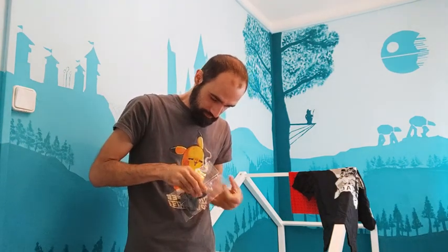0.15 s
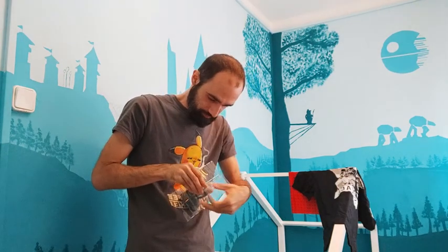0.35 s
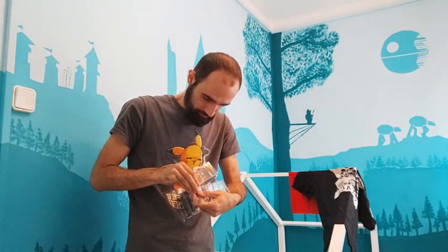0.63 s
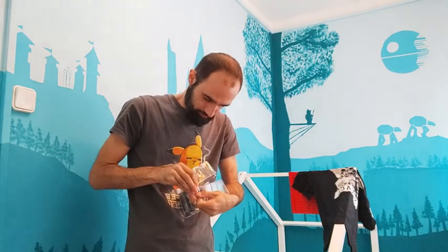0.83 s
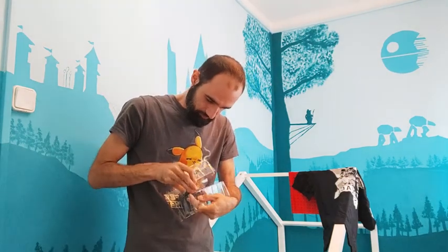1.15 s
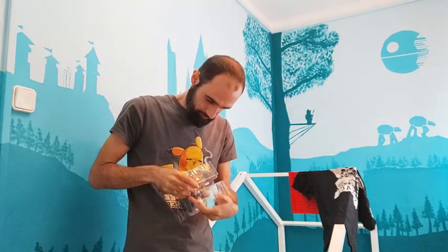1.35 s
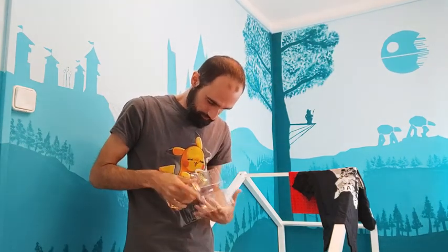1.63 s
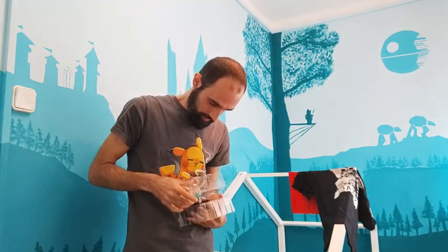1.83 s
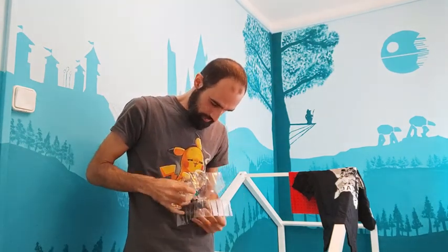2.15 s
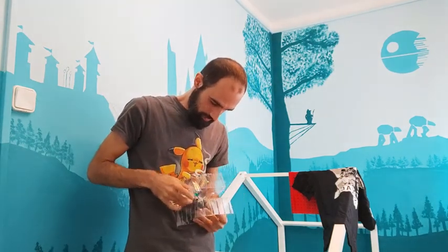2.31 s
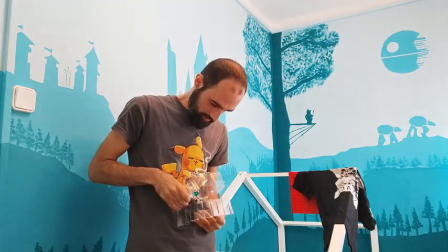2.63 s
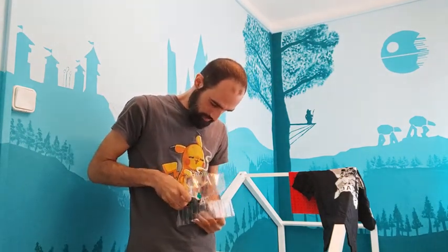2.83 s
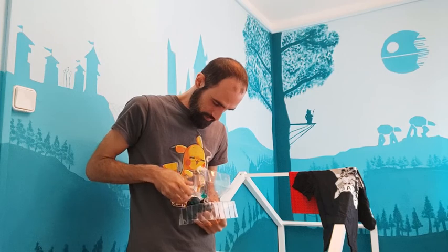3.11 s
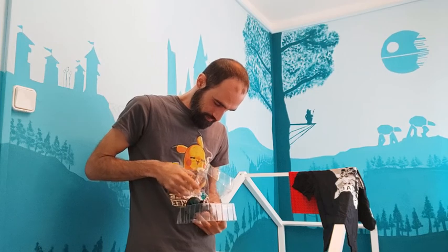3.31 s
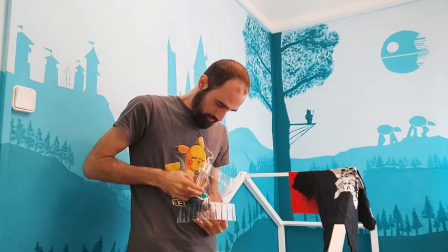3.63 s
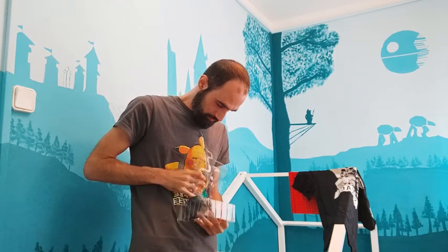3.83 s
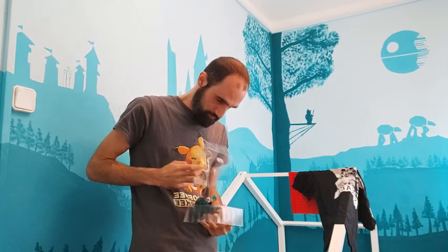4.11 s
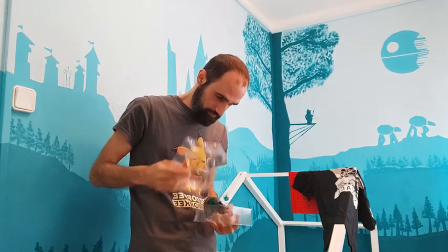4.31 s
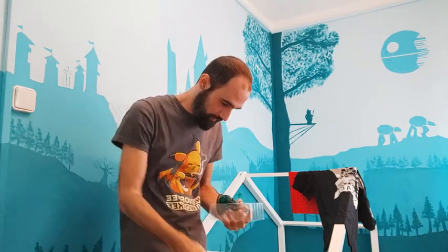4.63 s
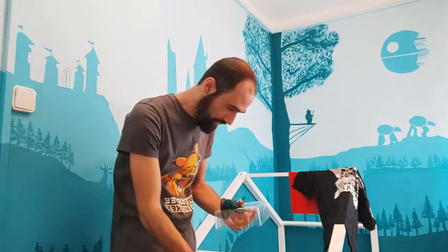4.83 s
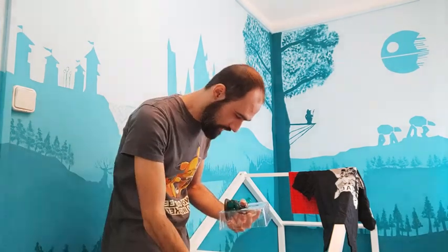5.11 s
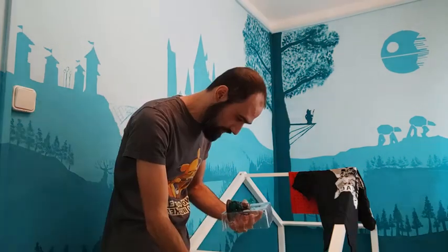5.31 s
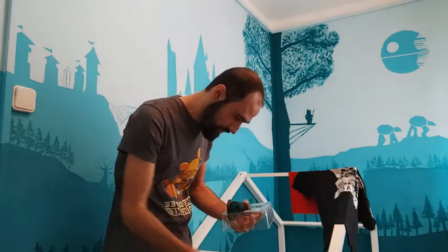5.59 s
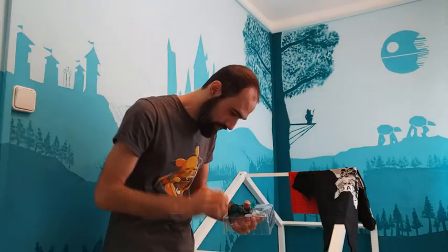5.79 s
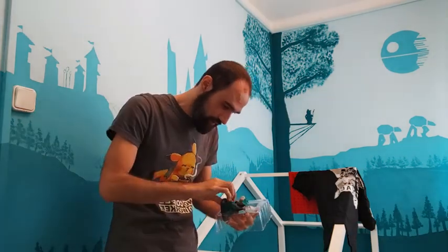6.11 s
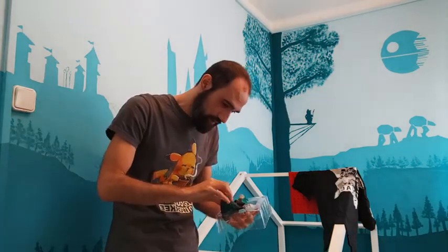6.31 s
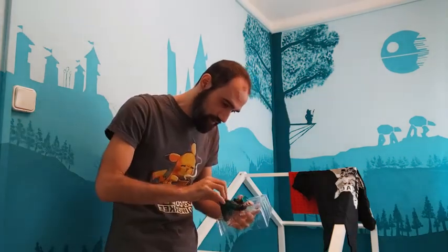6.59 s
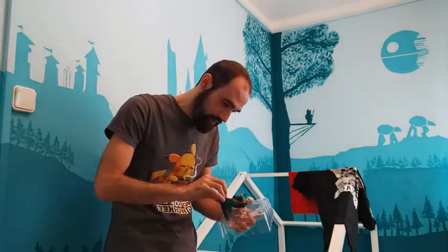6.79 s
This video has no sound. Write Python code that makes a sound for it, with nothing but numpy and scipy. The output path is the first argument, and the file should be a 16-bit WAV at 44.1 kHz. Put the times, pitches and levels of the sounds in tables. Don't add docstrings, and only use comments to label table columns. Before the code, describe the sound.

In a bare, reverberant bedroom, a man's hands bend and pry a thin ribbed plastic package about two metres from the microphone. Sharp snaps come in uneven clusters, with creaking sheet, twanging ribs, hollow pops and soft thuds. The crackling is densest near three seconds, a hard crack follows around 4.4, then weaker snaps fade into faint ticks over rumble, hum and hiss.

```python
import sys
import numpy as np
from scipy import signal
from scipy.fft import rfft, irfft
from scipy.io import wavfile
from scipy.ndimage import uniform_filter1d

SR = 44100
rng = np.random.default_rng(int(sys.argv[2]) if len(sys.argv) > 2 else 0)


def level_to_linear(level):
    exponent = np.asarray(level, float) / 20
    return 10 ** exponent


def master(y):
    cut = np.clip(np.atleast_2d(y).T, -1, 1)
    pcm = np.round(cut * 32767)
    wavfile.write(sys.argv[1], SR, pcm.astype(np.int16))


N = 306492
ARRIVAL_S = 0.0015


def rms_one(x):
    return x / np.sqrt(np.mean(x ** 2) + 1e-20)


def at_hz(points, hz):
    table = np.array(points)
    return np.interp(np.log(hz), np.log(table[:, 0]), table[:, 1])


def ring(clicks, hz, t60):
    radius = level_to_linear(-60 / (t60 * SR))
    angle = 2 * np.pi * hz / SR
    return signal.lfilter([0, np.sin(angle)], [1, -2 * radius * np.cos(angle), radius ** 2], clicks + 1e-18)


def causal(db, size):
    cepstrum = irfft(db * np.log(10) / 20, size)
    cepstrum[..., 1:size // 2] *= 2
    cepstrum[..., size // 2 + 1:] = 0
    return np.exp(rfft(cepstrum))


EDGES_HZ = 24 * 2 ** np.arange(0, 9.6, .4)


def stereo_bands(size, likeness, shape):
    white = rng.standard_normal((2, 2, size))
    out = 0
    for k, (low, high) in enumerate(zip(EDGES_HZ, EDGES_HZ[1:])):
        hz = np.sqrt(low * high)
        mid, side = white[k % 2]
        alike = np.clip(at_hz(likeness, hz), -1, 1)
        pair = np.sqrt((1 + alike) / 2) * mid + np.sqrt((1 - alike) / 2) * side * [[1], [-1]]
        band = signal.butter(2, [low, high], "band", fs=SR, output="sos")
        out = out + signal.sosfilt(band, shape(hz, pair))
    return out


# (f/Hz, level/dB per Hz)
FLOOR = [(50, -28), (85, -3.5), (101, -3.5), (195, 3), (249, -8.5), (926, -22.5), (1030, -13.5),
         (1570, -29), (2080, -21), (3300, -29.5), (8290, -26), (10300, -33.5), (16000, -50)]
# (f/Hz, likeness 0..1)
FLOOR_LIKENESS = [(60, 0.9), (240, 0.5), (950, 0.04), (3770, 0.07), (15000, 0.48)]
FLOOR_DB = -68
HUM_HZ, HUM_WIDTH_HZ, HUM_DB = 50, 3.6, -64.5


def background():
    white = stereo_bands(N, FLOOR_LIKENESS, lambda hz, noise: noise)
    hz = np.arange(N // 2 + 1) * SR / N + 1
    hiss = irfft(rfft(white) * level_to_linear(at_hz(FLOOR, hz)), N)
    settle = 40000
    hum = rng.standard_normal(N + settle)
    hum = ring(hum, HUM_HZ, 2.2 / HUM_WIDTH_HZ)
    hum = ring(hum, HUM_HZ, 0.057)[settle:]
    hum_sides = level_to_linear(np.array([[2.2], [-2.2]]))
    return level_to_linear(FLOOR_DB) * rms_one(hiss) + level_to_linear(HUM_DB) * rms_one(hum) * hum_sides


# (t/s, spread/s, level/dB, bright share level/dB)
BENDS = [(.01, 0.03, -36, 6.5), (0.188, 0.083, -29.5, -0.5), (.48, 0.04, -52, 5.5), (.69, 0.16, -44, -23),
         (0.829, 0.036, -55, 5.5), (1.11, 0.049, -40, -7.5), (1.3, 0.25, -44, 1), (1.59, 0.094, -40.5, 2.5),
         (2.05, 0.37, -56, 4.5), (2.42, 0.042, -68.5, 14), (2.67, 0.033, -52, -10),
         (2.81, 0.051, -43.5, 25.5), (2.94, 0.025, -34.5, 3.5), (3.031, 0.14, -38.5, -22.5),
         (3.42, 0.22, -49.5, 8.5), (3.83, .06, -52, 8), (4.1, 0.098, -51, 6.5), (4.449, 0.12, -55.5, -5.5),
         (4.6, 0.22, -64.5, 15), (5.07, 0.16, -50.5, 0.5), (5.46, 0.075, -38.5, -26),
         (5.56, 0.11, -39.5, -3), (5.75, 0.18, -59.5, -3), (6.2, 0.028, -72, -9), (6.49, 0.057, -71, -1),
         (6.58, 0.055, -70.5, 1), (6.68, 0.059, -68.5, 2), (6.76, .05, -73, -9), (5.98, 0.031, -79, -4)]
BEND_RISE_DB, BEND_FALL_DB = 16, 13


def bending(step=200):
    s, spread, db, bright_db = np.transpose(BENDS)[..., None]
    knots = np.arange(0, N, step)
    late = (knots / SR - s) / spread
    swell_db = db + np.minimum(BEND_RISE_DB * late, -BEND_FALL_DB * late)
    dull = level_to_linear(swell_db).sum(axis=0)
    bright = level_to_linear(swell_db + bright_db).sum(axis=0)
    return [np.interp(np.arange(N), knots, gain) for gain in (dull, bright)]


def creak():
    wander = np.repeat(rng.standard_normal(N // 400 + 1), 400)[:N]
    clumps = level_to_linear(6.8 * rms_one(wander))
    slips = rng.random((2, N)) < 400 * clumps / SR
    slips = slips * level_to_linear(2.2 * np.minimum(rng.exponential(1, (2, N)), 5))
    slips = slips * rng.choice([-1, 1], (2, N))
    dull = signal.sosfilt(signal.butter(2, 2500, fs=SR, output="sos"), slips[0] + 1e-18)
    bright = signal.sosfilt(signal.butter(2, 2500, "high", fs=SR, output="sos"), slips[1] + 1e-18)
    dull_gain, bright_gain = bending()
    return rms_one(dull) * dull_gain * level_to_linear(-8) + rms_one(bright) * bright_gain * level_to_linear(-9.5)


PARTS_HZ = [520, 1400, 2700, 3500, 7400]
RIM_FOLLOWS_RIBS, RIM_DB = 0.39, 2
RIB_TOP_DB = 0
VOLLEY_S, FOLLOWERS_DB = 0.0027, -3
RAGGED_DB = 7


def buckle(film_db, panels_db, ribs_db, length, count=24, size=4096):
    wait, strength, sign = rng.random((count, 3)).T
    volley = np.zeros(size)
    delays = np.minimum(-length * np.log(wait) * SR, size // 2).astype(int)
    np.add.at(volley, delays, level_to_linear(FOLLOWERS_DB - 16 * strength) * np.sign(sign - .5))
    volley[0] = VOLLEY_S / length

    hz = np.arange(size // 2 + 1) * SR / size + 1
    rim_db = RIM_DB + RIM_FOLLOWS_RIBS * ribs_db
    parts_db = np.array([panels_db, ribs_db, ribs_db + RIB_TOP_DB, rim_db, 0])
    per_hz_db = parts_db - 10 * np.log10(np.array(PARTS_HZ) / PARTS_HZ[-1])
    ragged = np.c_[np.geomspace(300, 16000, count), RAGGED_DB * (strength - .5)]
    colour_db = film_db + 12.0 + at_hz(ragged, hz) + at_hz(np.c_[PARTS_HZ, per_hz_db], hz)

    spread = rfft(rms_one(volley) / np.sqrt(size))
    spread /= causal(15 * np.log10(abs(spread) + 0.14), size)
    return irfft(spread * causal(colour_db, size), size)


# (t/s, film level/dB, panels level/dB, ribs level/dB), the last two relative to the film
CRACKS = [(.003, -20, -12, -2), (.064, -13.5, -18, -5.5), (.155, -8.5, -30, -7.5), (0.795, -24, -14.5, -13),
          (1.189, -24.5, -1, -3), (1.264, -11, -19, -7.5), (1.432, -8, -18.5, -4.5),
          (1.491, -15.5, -8.5, -3.5), (1.573, -20, -19, -14), (2.219, -27.5, -14.5, -8),
          (2.616, -19.5, -23.5, -7), (2.681, -28.5, -42, 3), (2.748, -22.5, -26.5, -10),
          (2.796, -14.5, -15, -14), (2.849, -21.5, -10.5, -7), (2.913, -10, -18.5, -8),
          (2.938, -8.5, -21, -3.5), (3.025, -8.5, -29.5, -8.5), (3.134, -9.5, -22, -8),
          (3.466, -19, -14.5, -7.5), (3.766, -2, -10, 5.5), (4.026, -26, -3.5, 0), (4.379, -27, -4, -2),
          (4.409, 1.2, -22.5, -6.5), (4.679, -32, -17, -9), (4.886, -42, 20.5, -23),
          (5.418, -14.5, -13, -3.5), (5.6, -21.5, -7, 2), (5.801, -36.5, -50, 6)]
# (t/s, film level/dB, panels level/dB, ribs level/dB), likewise
YIELDS = [(.088, -18.5, -8, 0), (0.485, -32.5, -12, -5.5), (.642, -17.5, -6.5, -2), (.755, -44.5, 17, -3.5),
          (.821, -10, -11, -4), (1.021, -3, -13.5, -3.5), (1.026, -3.5, -7, 2), (1.806, -20.5, -4, -1),
          (2.823, -3.5, -11.5, 4.5), (2.892, -5.5, -19, -7), (3.296, -31.5, 2.5, -2.5),
          (3.315, -17, -10.5, -8), (3.377, -20.5, -13, 1.1), (3.504, -18.5, -13.5, -1.2),
          (3.744, -20, -11, 0), (4.005, -43, 5.5, 11), (4.049, -16, -12.5, 1.3), (4.870, -34, 10, 12.5),
          (5.039, -43.5, 13.5, 2), (5.233, -27.5, 5.5, 13), (5.511, -24.5, 2, -1), (5.540, -19, -41, -1)]
# (t/s, film level/dB, ribs level/dB relative to the film)
TICKS = [(.46, -53, -7), (1.748, -34, -22), (1.996, -57, -8), (2.098, -27.5, -9), (2.347, -32.5, -9.5),
         (2.482, -28.5, -14.5), (2.708, -37, -4), (3.109, -46, -13), (3.683, -43.5, 0), (4.316, -39, 0.5),
         (5.459, -50, -6), (5.889, -52, 5), (5.979, -66, 0), (6.176, -47.5, -3.5), (6.48, -65, 0),
         (6.638, -53, 2.5)]
YIELD_S, WEAK_LASTS = .006, .21
TICK_S, TICK_PANELS_DB = 0.018, -3


def snaps(size=4096, places=3):
    rows = [(*row, VOLLEY_S) for row in CRACKS]
    rows += [(s, film, ribs + TICK_PANELS_DB, ribs, TICK_S) for s, film, ribs in TICKS]
    for s, film, panels, ribs in YIELDS:
        strongest_db = film + max(panels, ribs, 0)
        rows.append((s, film, panels, ribs, YIELD_S * level_to_linear(-WEAK_LASTS * strongest_db)))
    out = np.zeros((places, N + size))
    for k, (s, film, panels, ribs, length) in enumerate(rows):
        at = max(round((s + ARRIVAL_S) * SR), 0)
        out[k % places, at:at + size] += buckle(film, panels, ribs, length, size=size)
    return out[:, :N]


# (f/Hz, level/dB)
COLOUR = [(50, -41.5), (110, -17.5), (180, -6), (300, -9), (520, 3.5), (1100, 1), (1500, -3.5),
          (2700, -2.5), (3200, -8), (5300, -6), (7600, 4), (9000, 0.5), (10000, -12), (15200, -28),
          (16400, -31)]
# (f/Hz, level/dB)
LEFT_OVER_RIGHT = [(60, -20), (110, 11.5), (200, -0.5), (380, 6), (700, 3), (1290, 3.5), (2380, -0.5),
                   (4400, -3.5), (8120, -4), (15000, 8)]
# (f/Hz, t/s)
ROOM_T60 = [(100, 0.71), (260, 0.56), (700, 0.41), (1840, 0.4), (4850, 0.41), (12800, 0.32)]
# (f/Hz, likeness 0..1)
LIKENESS = [(60, .75), (130, 1), (290, 1), (640, 0.1), (1400, 0.02), (3000, 0.39), (5500, 0.087),
            (7500, 0.66), (10000, 1), (15000, 0.28)]
ROOM_DB, BUILD_UP_S = -25, 0.00098
EARLY_DB, EARLY_S = 4.5, 0.037


def bedroom(x):
    size = 2 ** 15
    t = np.arange(size) / SR
    hz = np.arange(size // 2 + 1) * SR / size + 1
    density = np.minimum(0.036 + 12 * t, 1)
    echoes = (rng.random(size) < density) / np.sqrt(density)
    echoes *= 1 - np.exp(-t / BUILD_UP_S)
    echoes *= level_to_linear(EARLY_DB * np.exp(-t / EARLY_S))

    def decay(f, noise):
        return noise * echoes * level_to_linear(ROOM_DB - 60 * t / at_hz(ROOM_T60, f))

    room = stereo_bands(size, LIKENESS, decay)
    room[:, 0] += 1
    colour_db = at_hz(COLOUR, hz) + at_hz(LEFT_OVER_RIGHT, hz) * np.array([[.5], [-.5]])
    response = irfft(rfft(room) * causal(colour_db, size), size)
    return signal.fftconvolve(x[None], response, axes=1)[:, :N]


def single_modes(rows, cycles, gain_db):
    size = 4096
    t = np.arange(size) / SR
    out = np.zeros(N + size)
    for s, peak_db, hz in rows:
        at = round((s + ARRIVAL_S) * SR)
        fade = level_to_linear(peak_db + gain_db - 60 * t * hz / cycles)
        out[at:at + size] += fade * np.sin(2 * np.pi * hz * t)
    return out[:N]


# (t/s, peak level/dB, f/Hz)
TWANGS = [(0.0657, -25, 1540), (0.6424, -37.5, 2020), (1.0266, -14.5, 2162), (1.2645, 2, 2740),
          (1.4336, -28, 2300), (1.5724, -30, 1290), (2.6154, -34, 2286), (2.6828, -42.5, 2120),
          (2.825, -3.5, 1494), (2.826, 8.5, 2050), (1.027, -16, 4250), (4.411, -10, 2170),
          (5.235, -24, 2400), (5.601, -3, 4600), (5.546, -32, 4500), (3.1334, -23, 2208),
          (3.3804, -30.5, 2245), (3.7534, -9, 1722), (3.7678, -4, 1630), (4.0272, -27, 1890),
          (4.0487, -23, 2200), (4.8778, -25, 2660), (5.235, -10, 1280), (5.4191, -40, 1200),
          (5.5454, -6.5, 2860), (5.8017, -30, 2500)]


def twangs():
    return single_modes(TWANGS, cycles=6.5, gain_db=-12.5)


# (t/s, peak level/dB, f/Hz)
POPS = [(0.155, -23, 837), (0.643, -28, 647), (0.821, -42.5, 503), (1.028, -8, 938), (1.03, -16, 567.5),
        (1.187, -24.5, 340), (1.806, -25.5, 1040), (2.939, -24.5, 572), (3.321, -27, 358),
        (3.38, -24, 1070), (3.51, -20, 1065), (3.769, -18, 526), (4.05, -29, 999), (4.412, -23, 644),
        (4.872, -24, 420), (4.888, -28, 519), (4.885, -26, 866), (5.234, -22, 594), (5.235, -32.5, 1000),
        (5.42, -23.5, 1130), (5.547, -34, 592), (5.602, -31.5, 586)]


def pops():
    return single_modes(POPS, cycles=19, gain_db=-6.5)


# (t/s, peak level/dB, f/Hz)
THUDS = [(0.156, -52, 198), (1.024, -37, 230), (1.43, -55, 189), (1.806, -68, 155), (2.822, -35, 170),
         (3.32, -40, 242), (3.38, -51, 185), (3.766, -37, 192), (4.047, -49.5, 195), (4.409, -46.5, 223),
         (4.874, -42, 223), (5.236, -45, 248), (5.458, -40.5, 218), (5.542, -36.5, 217), (5.658, -50, 233)]


def thuds():
    return single_modes(THUDS, cycles=21, gain_db=3.0)


LOWERED_S, LOWERING_S = 4.3, .2
RAISED_LEFT_DB, LOWERED_LEFT_DB = 0.67, 0


def scene():
    shell = snaps()
    shell[0] += creak() + thuds()
    shell[1] += pops()
    shell[2] += twangs()
    in_room = sum(bedroom(place) for place in shell)
    left_db = np.interp(np.arange(N) / SR, [LOWERED_S, LOWERED_S + LOWERING_S],
                        [RAISED_LEFT_DB, LOWERED_LEFT_DB])
    return in_room * level_to_linear(left_db * np.array([[.5], [-.5]])) + background()


# (f/Hz, threshold level/dB)
DROPOUT = [(900, -60), (1400, -10), (3000, -5), (4600, -2.8), (5800, -4), (8300, -9), (9800, .2),
           (16000, -1.5)]
ATTACK_SPARED_DB = 4.5


def thin_out(x, size=2048):
    mid_side = np.array([x[0] + x[1], x[0] - x[1]]) / 2
    hz, _, cells = signal.stft(mid_side, SR, "cosine", size, size // 2)
    power = abs(cells) ** 2
    near = uniform_filter1d(power, size=9, axis=1)
    around = uniform_filter1d(power[:1], size=71, axis=1)
    energy = power[0, 100:].sum(axis=0) + 1e-20
    attack = energy > 2.5 * np.roll(energy, 1)
    threshold = level_to_linear(2 * at_hz(DROPOUT, hz + 1))[:, None]
    strong = near * level_to_linear(2 * ATTACK_SPARED_DB * attack) > around * threshold
    keep = strong | attack * (hz < 9600)[:, None]
    mid, side = signal.istft(cells * keep, SR, "cosine", size, size // 2)[1][:, :N]
    return np.array([mid + side, mid - side])


def low_pass(x):
    return signal.sosfilt(signal.butter(12, 16470, fs=SR, output="sos"), x)


def record(dry):
    rounded = .95 * np.tanh(dry / .95)
    cut = signal.sosfilt(signal.cheby2(10, 60, 16500, fs=SR, output="sos"), rounded)
    mix = thin_out(cut)
    return low_pass(mix)


dry = scene()
out = record(dry)
master(out)
```